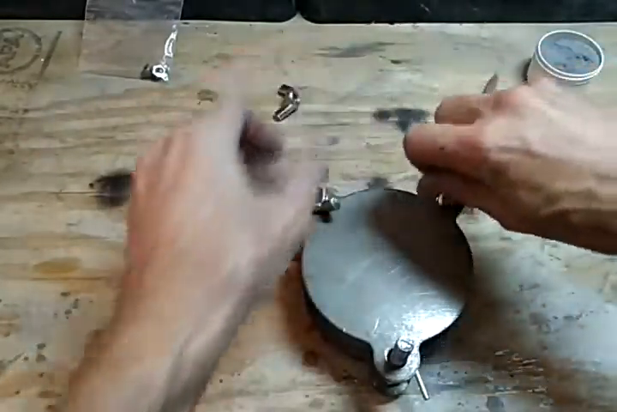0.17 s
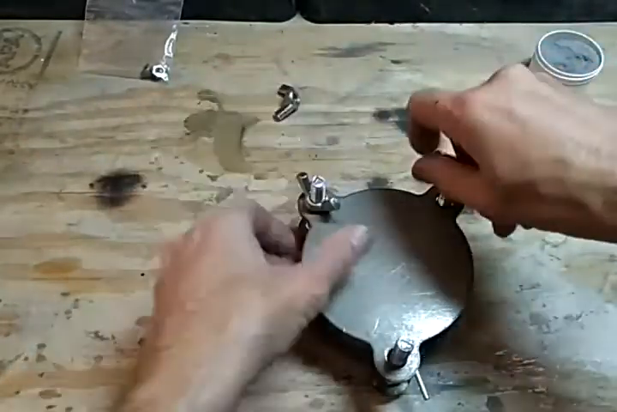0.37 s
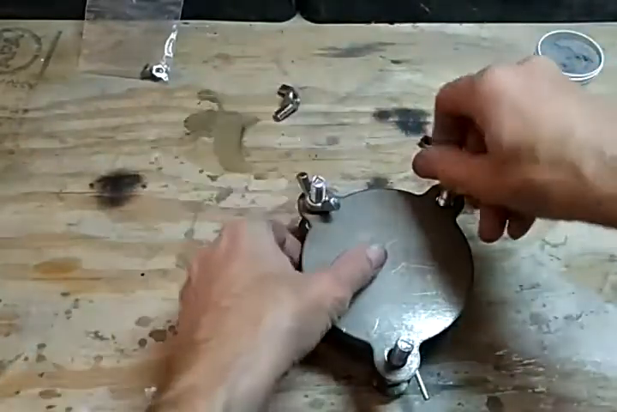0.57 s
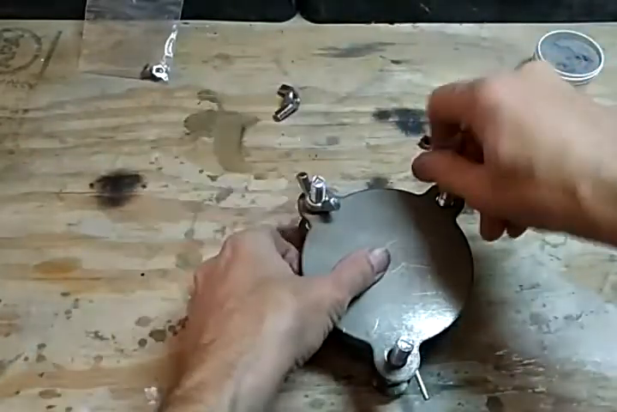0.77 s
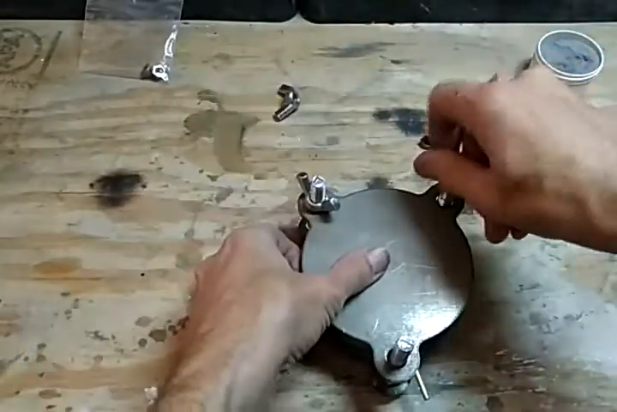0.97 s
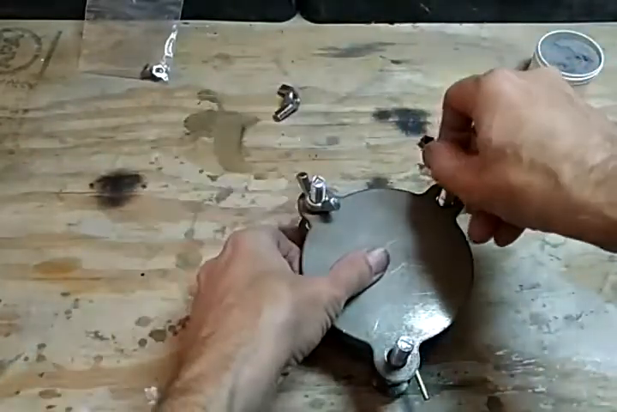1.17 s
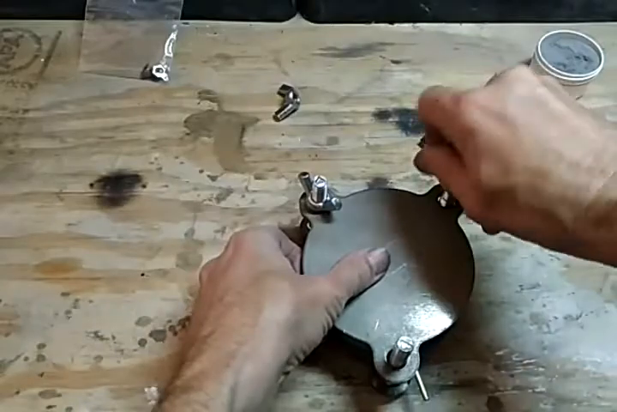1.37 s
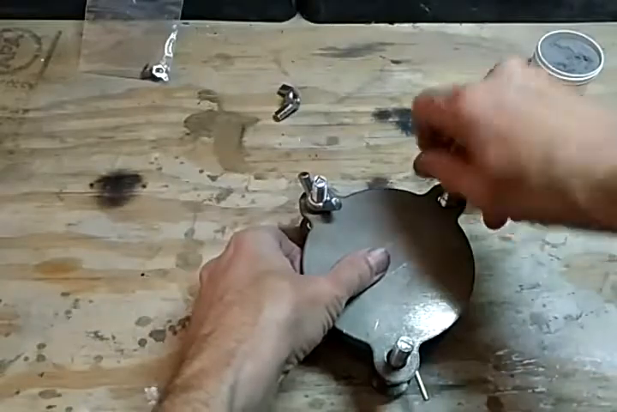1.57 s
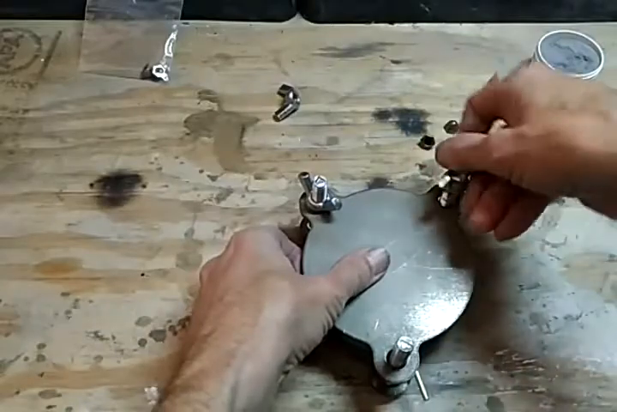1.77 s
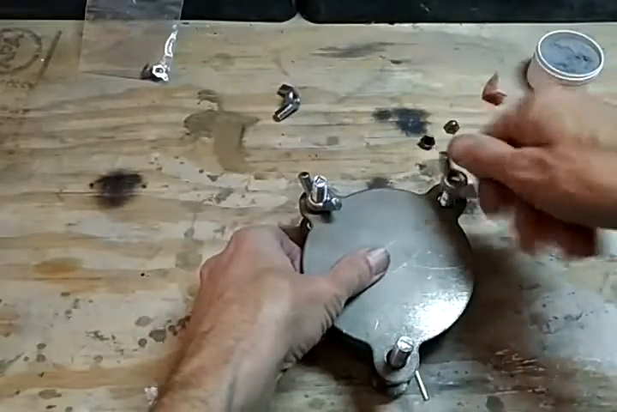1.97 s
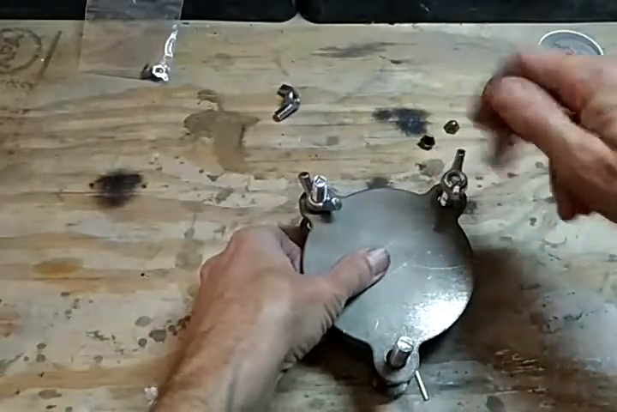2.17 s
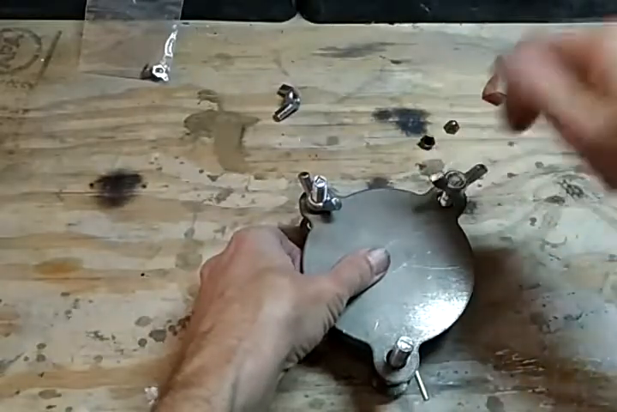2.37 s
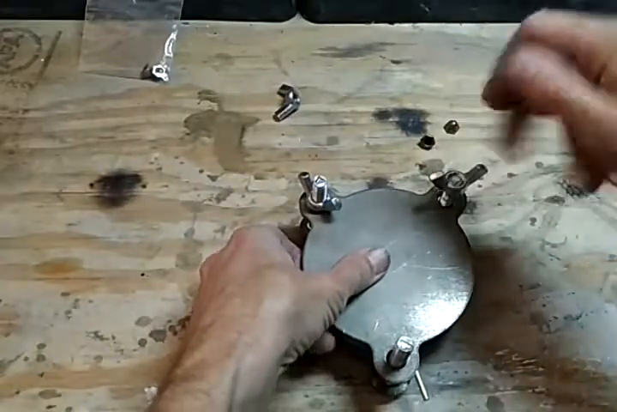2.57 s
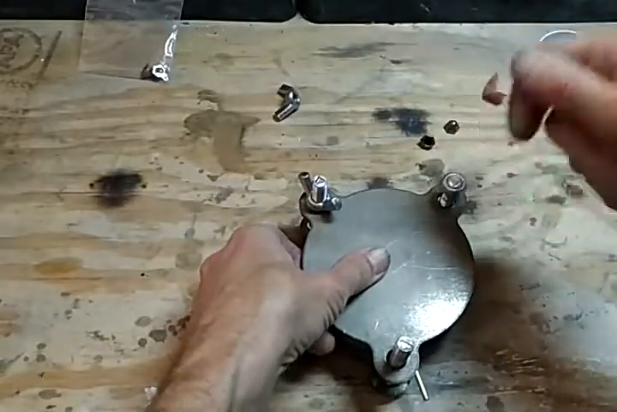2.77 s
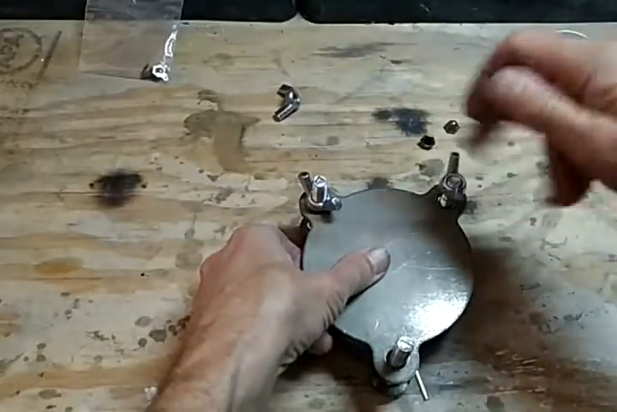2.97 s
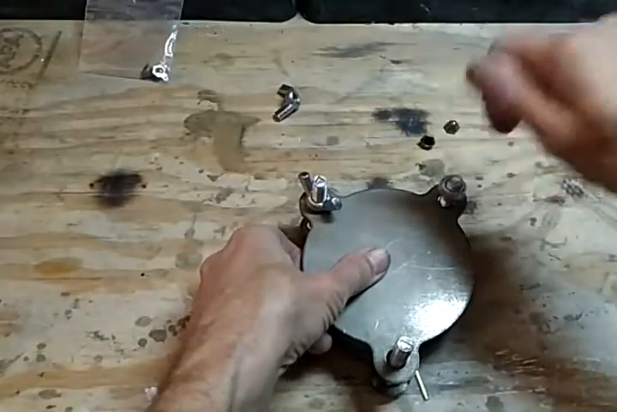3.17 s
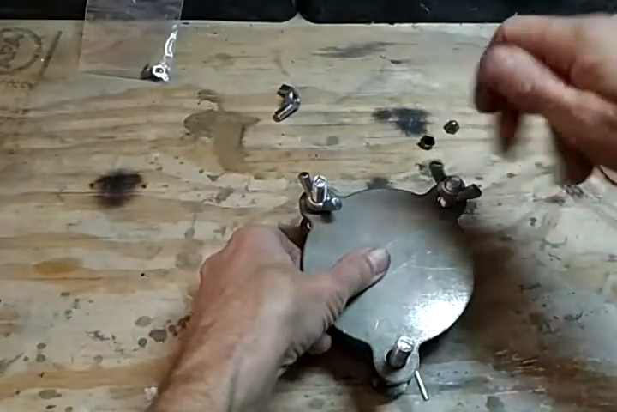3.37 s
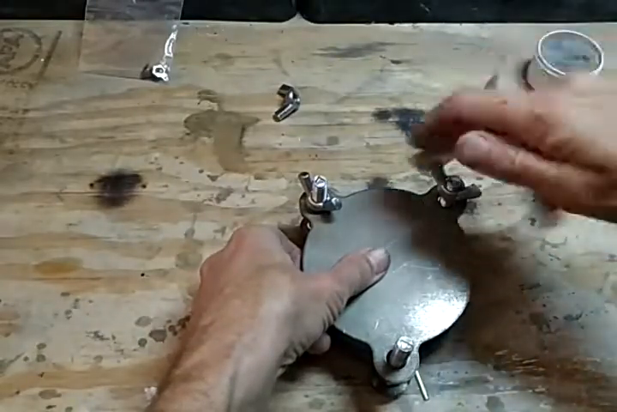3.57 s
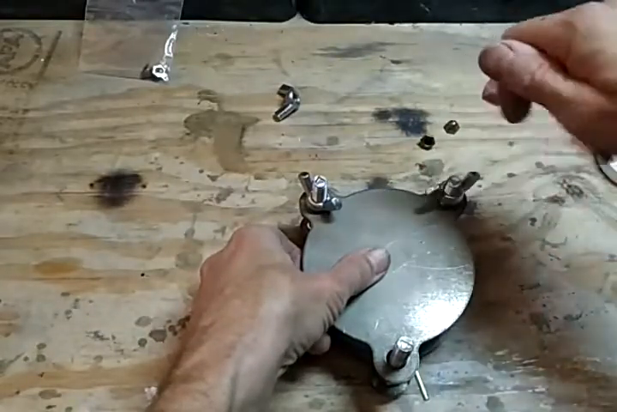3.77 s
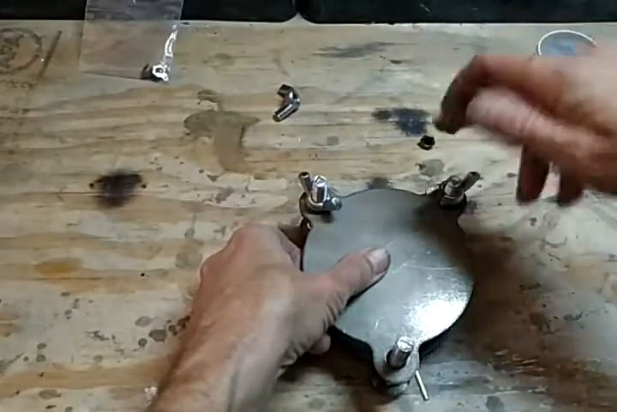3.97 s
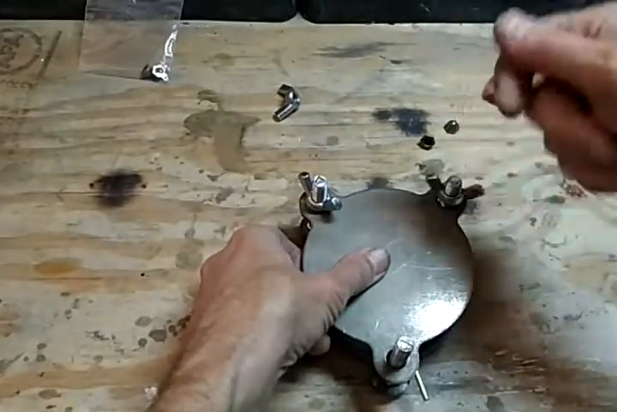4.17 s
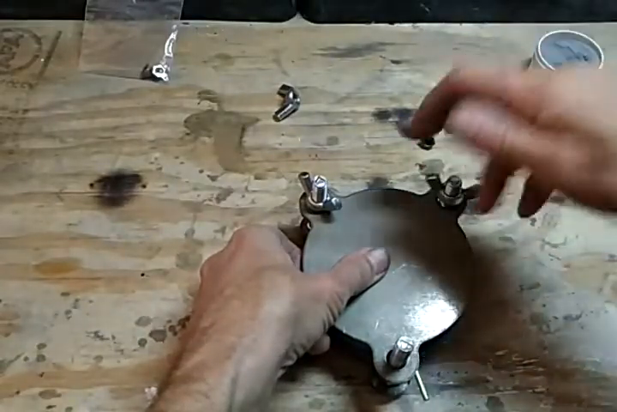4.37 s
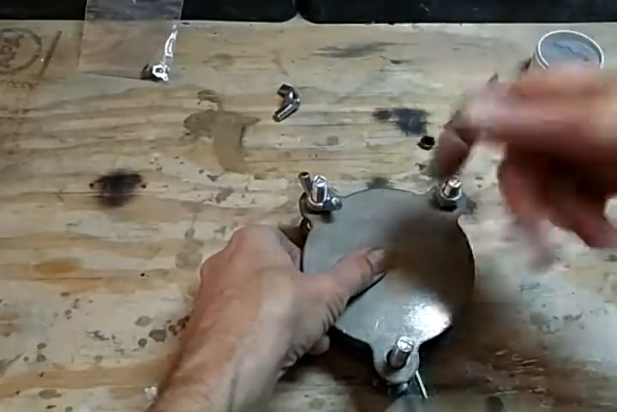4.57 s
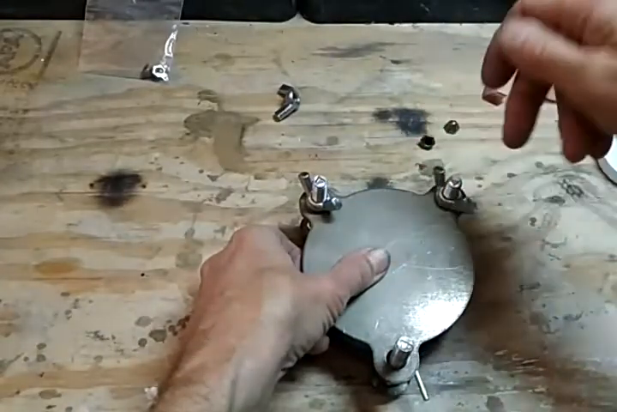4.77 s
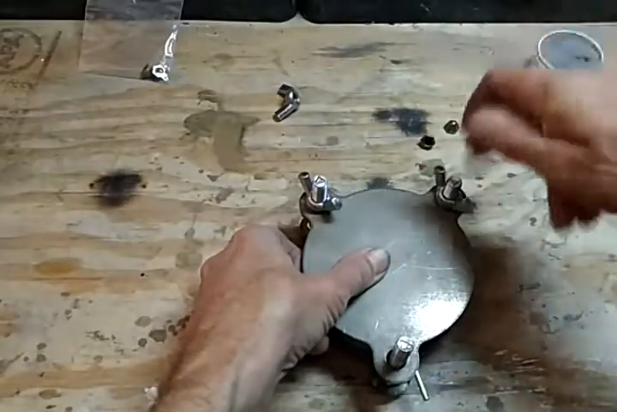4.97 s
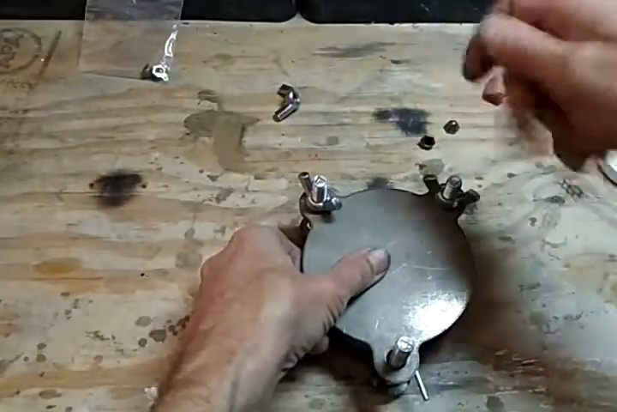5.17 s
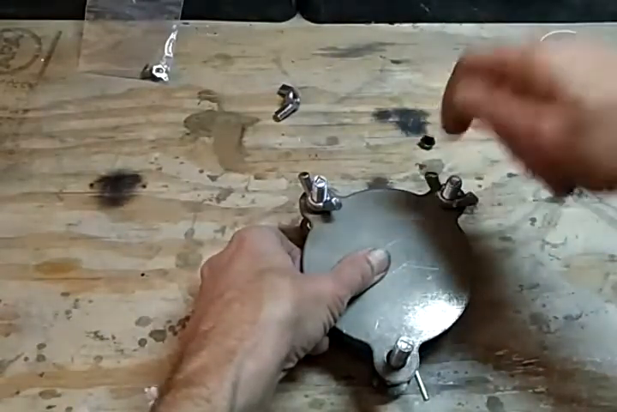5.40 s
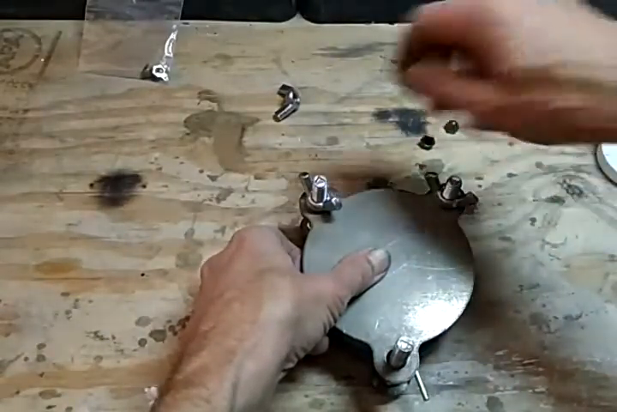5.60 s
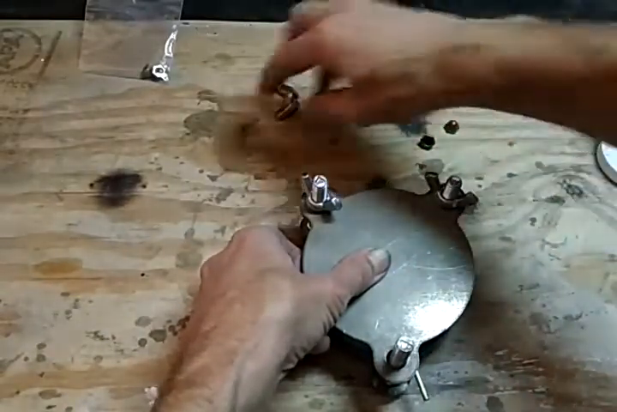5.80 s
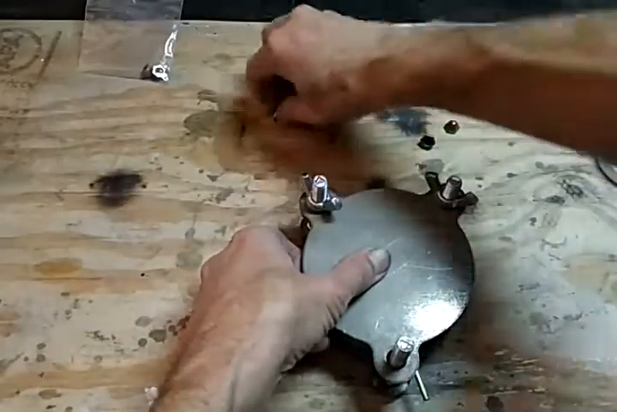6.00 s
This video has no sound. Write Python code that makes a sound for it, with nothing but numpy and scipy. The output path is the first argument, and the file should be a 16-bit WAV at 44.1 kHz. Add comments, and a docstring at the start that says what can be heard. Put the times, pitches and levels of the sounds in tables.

```python
"""A wing nut is started on the stud of a steel frame held down on a plywood workbench.
Fingers fumble it onto the thread and flick its wings: force pulses ring banks of modes and noise clouds.
After most wing contacts random thread blows chatter; the loose nut wobbles into clatters, a dry thread squeals.
Decaying bending modes thud as hands push the bench; one lands at the end and a spare nut ticks on wood.
Decaying noise is the small workshop's echo; shaped noise and sines are its air and faint mains hum."""
import sys
import numpy as np
from scipy import signal
from scipy.fft import rfft, irfft, next_fast_len
from scipy.io import wavfile
from scipy.ndimage import map_coordinates

SR = 44100
rng = np.random.default_rng(int(sys.argv[2]) if len(sys.argv) > 2 else 0)


def generate_wav(sig):
    """Save sig (samples, or channels by samples) to the path in sys.argv[1] as 16-bit PCM at SR."""
    pcm = np.round(np.clip(np.atleast_2d(sig).T, -1, 1) * 32767).astype(np.int16)
    wavfile.write(sys.argv[1], SR, pcm)


N = 266275

# Event levels are burst levels: the rms if all the energy fell within 10 ms.
# room air spectrum: [frequency_hz, relative_density_db_per_hz]
AIR_SPECTRUM = [(12, -67), (20, -41), (39, -24.5), (60, 3), (86, -12), (172, -6.5), (210, -15),
                (241, -12.5), (328, -18), (472, -17.5), (802, -19), (976, -20), (2390, -26.5),
                (16000, -33.5)]
# left-right correlation of the air: [frequency_hz, correlation_ratio]
AIR_CORRELATION = [(60, 0.8), (240, 0.8), (950, -0.049), (3770, -0.11), (15000, 0.043)]
# mains hum partials: [frequency_hz, rms_level_db]
HUM_PARTIALS = [(59.6, -81.5), (120, -78.5), (240, -84.5), (479.5, -80)]
# workshop echo decay: [frequency_hz, t60_s]
SHOP_DECAY = [(100, 0.34), (300, 0.5), (800, 0.35), (2000, 0.25), (5000, 0.22), (13000, 0.2)]
# soft pushes on the bench top, by the holding hand and the other hand landing: [start_s, level_db]
HAND_THUMPS = [(0.772,-52), (1.272,-49.5), (2.335,-43), (2.413,-43), (3.214,-43.5), (3.606,-41),
               (3.713,-35.5), (3.764,-42.5), (5.368,-47), (5.896,-30), (5.995,-46.5)]
# slow bending modes of the plywood: [frequency_hz, relative_level_db, t60_s]
PLYWOOD_MODES = [(91, -14.5, 0.18), (146.8, 0.5, 0.13), (177, -12, 0.11), (421, -8, 0.064)]
# fingers land on a spare nut lying on the bench and push it: [start_s, level_db, t60_s]
SPARE_NUT_TICKS = [(5.9025, -37.5, 0.034), (5.921, -46.5, 0.13), (5.952, -47.5, 0.046)]
# steel on wood: [frequency_hz, relative_density_db_per_hz]
TICK_SPECTRUM = [(350, 3), (650, -11), (1000, -0.5), (1400, 0.5), (2000, -5), (2900, -4.5), (4300, -22),
                 (5500, -20.5), (8500, -19), (15000, -52)]
# dry thread's lower tone, with both modes' level: [time_s, pitch_hz, level_db]
SQUEAL_CURVE = [(.44, 3360, -105), (.5, 3390, -78), (.62, 3390, -82), (.85, 3360, -80), (1.2, 3330, -83),
                (1.33, 3340, -105)]
# modes of each struck part, nominal: [frequency_hz, relative_level_db, t60_s]
BENCH_MODES = [(94.6, -9, 0.18), (148, 0, 0.12), (314.6, -4.5, 0.11), (362.7, -1, 0.11),
               (461.3, -1.5, 0.11)]
FRAME_MODES = [(818.4, 5.5, 0.081), (951, -5, 0.16), (1206, -13.5, 0.095), (1274, -4.5, 0.1),
               (1348, 5, 0.046), (1522, 2, 0.05), (2030, -1.5, 0.078), (2286, -4, 0.11)]
NUT_MODES = [(3110, -6, 0.025), (3490, -5.5, 0.017), (4550, -6, 0.057), (4800, 7, 0.026),
             (4846, 1.5, 0.022), (5730, -32, 0.047), (6550, -4.5, 0.083), (7040, 4, 0.055),
             (7340, -1, 0.059), (8180, -3, .04), (8260, -0.5, .04), (8700, 1.5, 0.071), (9760, -3.5, 0.034),
             (11350, -9.5, .03), (12270, -6.5, 0.067), (12620, -13.5, 0.036), (14500, -23, 0.028),
             (15400, -26, .025)]
# dense, quickly damped resonances between those modes: [frequency_hz, relative_density_db_per_hz]
BENCH_CLOUD = [(35, -45), (75, -23), (140, -1), (230, -18), (350, 3), (500, -8), (700, -12), (1500, -61)]
FRAME_CLOUD = [(300, -9.5), (600, -11), (830, 2), (1050, -0.5), (1400, 1.5), (1780, -11.5), (2250, -0.5),
               (2650, -13), (3500, -8), (7000, -75)]
NUT_CLOUD = [(1300, -45), (2500, -11), (3400, -2.5), (4000, -15.5), (4700, 9), (5400, -5.5), (6800, -1),
             (8400, 3.5), (9300, -12), (10600, -22), (12400, -17), (13600, -19), (14600, -18.5),
             (16000, -37)]
# gain of the metal sound in the right channel: [frequency_hz, gain_db]
RIGHT_CHANNEL_SHADE = [(2500, -0.5), (4200, -1.5), (6400, -7), (8200, -16.5), (10000, -12.5), (15000, -6)]
# nut bumps the stud, mostly while fingers feel for the thread: [contact_s, click_db, thud_db]
STUD_TAPS = [(0.0722,-48,-44), (.0766,-36.5,-44), (.135,-59,-52), (.287,-67.5,-51), (0.3925,-52.5,-52.5),
             (.406,-72.5,-50.5), (.54,-83,-63), (0.7578,-44,-45.5), (0.9594,-70.5,-53), (1.0481,-57,-56.5),
             (1.2603,-69,-46.5), (1.552,-75,-61), (1.605,-73,-53.5), (1.6563,-43,-46), (1.9187,-43,-53),
             (1.943,-39,-44), (2.749,-44.5,-46.5), (2.868,-48,-49.5)]
# clatters of the wobbling nut: [hardest_knock_s, knock_gap_s, frame_db, nut_db], levels of the hardest knock
WOBBLE_CLATTERS = [(2.356,0.0093,-35.5,-31), (2.804,.0095,-34.5,-31), (3.127,0.0069,-43.5,-40.5),
                   (3.165,0.0053,-38.5,-35.5), (3.219,0.01,-33,-26), (3.625,.008,-41,-39),
                   (3.688,.009,-43,-46), (3.726,.008,-29,-23), (4.064,0.0093,-32.5,-26.5),
                   (4.084,.005,-38.5,-32), (4.695,0.014,-39.5,-40), (5.064,0.0076,-42.5,-43)]
# bright contacts at the wing, most followed by a spin; the one at 5.357 s is a faint lead-in to the next:
# [contact_s, click_db, thud_db, hardness_db_per_octave, spin_length_s]
WING_CONTACTS = [(2.31,-27,-37,-1,0.057), (2.6899,-23.5,-37,1,0.13), (3.114,-49,-41.5,-10,0.12),
                 (3.5837,-41.5,-45.5,3,0.11), (4.0379,-21.5,-35,5.5,0.083),
                 (4.4113,-45.5,-47.5,12.5,0.0074), (4.523,-31.5,-47,5,.21), (5.0105,-36.5,-42.5,10.5,0.021),
                 (5.357,-64,-59.5,13,0), (5.3653,-51,-46,-8,0.0029)]

LOW_CUT_HZ, TOP_HZ = 47, 16000
LIFE_SAMPLES = SR // 3  # echo, thump and tick length; a part's own ring has half
AGE_S = np.arange(LIFE_SAMPLES) / SR
TAP_HARDNESS_DB_PER_OCTAVE = -8.5  # held between the fingers, the nut sounds dull
FRAME_CLICK_SHARE = 0.32  # frame level in dB: this share of the click, the rest of the thud
# noise lead-in relative to the knock: LEAD_IN_DB at a click of LEAD_IN_AT_DB, lower for stronger clicks
LEAD_IN_DB, LEAD_IN_FALL_DB_PER_DB, LEAD_IN_AT_DB = -11.5, 0.58, -41.5
SWELL_DB_PER_KNOCK, FADE_DB_PER_KNOCK = 2, 10  # up to the hardest knock, then down
KNOCK_WIDTH_SHARE = 0.27  # Gaussian sigma of a flurry, as a share of the knock gap
MELLOW_DB, HARDENING_DB_PER_OCTAVE_PER_DB = -31.5, 0.13  # louder knocks than MELLOW_DB are brighter
SPIN_SWELL_DB = 1  # slope over a whole spin, taken in steps
SQUEAL_FLUTTER_DB = 4


def amp(db):
    """Decibels to gain."""
    return 10 ** (np.asarray(db) / 20)


def unit(x):
    """x at rms 1."""
    return x / np.sqrt(np.mean(x ** 2) + 1e-20)


def burst(x):
    """x with the mean energy per channel of 10 ms at rms 1."""
    return unit(x) * np.sqrt(SR / 100 / x.shape[-1])


def along(points, hz):
    """Interpolate (Hz, value) points on a log frequency axis."""
    point_hz, values = np.transpose(points)
    return np.interp(np.log(hz + 1), np.log(point_hz + 1), values)


def filtered(x, gain):
    """x times a gain that depends on frequency."""
    n = x.shape[-1]
    padded = next_fast_len(n + SR // 20, True)
    spectrum = rfft(x, padded) * gain(np.fft.rfftfreq(padded, 1 / SR))
    return irfft(spectrum, padded)[..., :n]


def spread(pair, width):
    """Left and right from a shared and an opposed signal."""
    shared, opposed = pair[0], width * pair[1]
    return np.array([shared + opposed, shared - opposed])


def add(track, start_s, sound):
    """Mix a sound into the track at start_s."""
    part = track[:, max(round(start_s * SR), 0):][:, :sound.shape[-1]]
    part += sound[:, :part.shape[-1]]


def wobble(rate_hz):
    """Smooth random curve with rate_hz knots a second."""
    knots = rng.standard_normal(int(N * rate_hz / SR) + 4)
    return map_coordinates(knots, [np.arange(N) * rate_hz / SR])


def room_tone(air_db):
    """Steady air noise, its likeness between channels set per frequency, plus mains hum sines."""
    def stereo_gain(hz):
        angle = np.arccos(np.clip(along(AIR_CORRELATION, hz), -1, 1)) / 2
        return amp(along(AIR_SPECTRUM, hz)) * [np.cos(angle), np.sin(angle)]

    air = filtered(rng.standard_normal((2, N)), stereo_gain)
    t_s = np.arange(N) / SR
    hum = sum(amp(db) * unit(np.sin(2 * np.pi * (hz * t_s + rng.random()))) for hz, db in HUM_PARTIALS)
    return amp(air_db) * unit(spread(air, 1)) + hum


def shop_echo():
    """Impulse response of the shop: noise in which each frequency dies at its own speed."""
    noise = rng.standard_normal((2, LIFE_SAMPLES))
    hz, t_s, bins = signal.stft(noise, SR, nperseg=256)
    decay = amp(-60 * t_s / along(SHOP_DECAY, hz)[:, None])
    tail = signal.istft(bins * decay, SR, nperseg=256)[1][:, :LIFE_SAMPLES]
    onset = (1 - np.exp(-AGE_S / 0.0018)) ** 2
    tail = spread(tail * onset, 0.34)
    return tail / np.linalg.norm(tail[0])


def thumps(rise_s, room_db):
    """Soft flesh wakes only the lowest bending modes of the bench top, with a slow onset."""
    track = np.zeros((2, N))
    for start_s, level_db in HAND_THUMPS:
        flex = sum(amp(db - 60 * AGE_S / t60_s) * np.sin(2 * np.pi * hz * AGE_S)
                   for hz, db, t60_s in PLYWOOD_MODES)
        flex = amp(level_db) * burst(flex * (1 - np.exp(-AGE_S / rise_s)))
        echo = signal.fftconvolve(flex[None], shop_echo(), axes=1)[:, :LIFE_SAMPLES]
        add(track, start_s, flex + amp(room_db) * echo)
    return track


def pickup(room_db):
    """Pinched against wood the spare nut cannot ring: decaying noise gives dull ticks."""
    track = np.zeros((2, N))
    for start_s, level_db, t60_s in SPARE_NUT_TICKS:
        noise = rng.standard_normal((2, LIFE_SAMPLES))
        tick = filtered(noise, lambda hz: amp(along(TICK_SPECTRUM, hz)))
        tick = amp(level_db) * burst(spread(tick, 0.8) * amp(-60 * AGE_S / t60_s))
        echo = signal.fftconvolve(tick, shop_echo(), axes=1)[:, :LIFE_SAMPLES]
        add(track, start_s, tick + amp(room_db) * echo)
    return track


def squeal(upper_db, flutter_db):
    """The dry thread sings thinly on two modes, uneven in pitch and level, as the nut is started."""
    time_s, pitch_hz, level_db = np.transpose(SQUEAL_CURVE)
    t_s = np.arange(N) / SR
    hz = np.interp(t_s, time_s, pitch_hz) * (1 + 0.0087 * wobble(74))
    phase = 2 * np.pi * np.cumsum(hz) / SR
    tone = np.sin(phase) + amp(upper_db) * np.sin(1.61 * phase)
    tone = tone * amp(flutter_db * wobble(18.4))
    return unit(tone) * np.interp(t_s, time_s, amp(level_db), left=0, right=0)


def ring(modes, spectrum, cloud_db, cloud_t60_s, width, hardness=0):
    """A struck part: modes at random strengths and phases, plus a fast-dying cloud of resonances."""
    t_s = AGE_S[:LIFE_SAMPLES // 2]
    hz, db, t60_s = np.transpose(modes)

    def tilt(f):  # a harder blow favours the upper modes; hardness in dB per octave
        return amp(hardness * np.log2(np.clip(f / hz[0], 1, 3)))

    size = amp(db + 2.4 * rng.standard_normal(len(hz))) * tilt(hz)
    turn = np.exp(2j * np.pi * rng.random((2, len(hz))))
    decaying = np.exp(np.outer(2j * np.pi * hz - np.log(1000) / t60_s, t_s))
    lines = ((size * turn) @ decaying).real
    noise = rng.standard_normal((2, len(t_s)))
    cloud = filtered(noise, lambda f: amp(along(spectrum, f)) * tilt(f))
    cloud = cloud * amp(-60 * t_s / cloud_t60_s)
    return spread(unit(lines) + amp(cloud_db) * unit(cloud), width)


def shake(force, frame_db, bench_db, nut_db, hardness):
    """A force at the nut rings the nut at once, then the frame, then the heavy bench top."""
    t_s = AGE_S[:LIFE_SAMPLES // 2]
    # a blow cushioned by a finger is all thud, and dulls the frame too
    softening = -0.8 * max(bench_db - nut_db - 10.0, 0)
    nut = ring(NUT_MODES, NUT_CLOUD, cloud_db=3.5, cloud_t60_s=0.019, width=1.0, hardness=hardness)
    frame = ring(FRAME_MODES, FRAME_CLOUD, cloud_db=1.0, cloud_t60_s=0.063, width=0.56, hardness=softening)
    bench = ring(BENCH_MODES, BENCH_CLOUD, cloud_db=1.5, cloud_t60_s=0.11, width=0.11)
    frame = frame * (1 - np.exp(-t_s / 0.00018))
    bench = bench * (1 - np.exp(-t_s / 0.004))

    def driven(part, level_db):
        return amp(level_db) * burst(signal.fftconvolve(part, force[None], axes=1))

    nut, frame, bench = driven(nut, nut_db), driven(frame, frame_db), driven(bench, bench_db)
    echo_send = amp(-11.5) * nut + amp(-12) * frame + amp(-12) * bench
    sound = signal.fftconvolve(echo_send, shop_echo(), axes=1)
    add(sound, 0, nut + frame + bench)
    return sound


def chatter(contact_rate_hz, scatter_db):
    """Tiny uneven blows of thread on thread, at random moments."""
    chance = rng.random(LIFE_SAMPLES)
    size = rng.standard_normal(LIFE_SAMPLES)
    side = rng.choice([-1, 1], LIFE_SAMPLES)
    return (chance < contact_rate_hz / SR) * side * amp(scatter_db * size)


def rattles(bench_db, count):
    """The wobbling nut knocks ever harder, then once more weakly; each knock is a flurry of blows."""
    track = np.zeros((2, N))
    for hardest_s, gap_s, frame_db, nut_db in WOBBLE_CLATTERS:
        width_s = KNOCK_WIDTH_SHARE * gap_s
        reach_s = width_s * 2.5
        t_s = np.arange(-reach_s, reach_s, 1 / SR)
        for k in np.arange(count) - (count - 2):  # 0 is the hardest knock
            db = min(SWELL_DB_PER_KNOCK * k, -FADE_DB_PER_KNOCK * k)
            blows = chatter(contact_rate_hz=1000, scatter_db=3.5)[:len(t_s)]
            force = blows * np.exp(-0.5 * (t_s / width_s) ** 2)
            force[len(t_s) // 2] += 1  # the wobble always lands a blow at its peak
            hardness = HARDENING_DB_PER_OCTAVE_PER_DB * (nut_db + db - MELLOW_DB)
            knock = shake(force, frame_db + db, frame_db + db + bench_db, nut_db + db, hardness)
            add(track, hardest_s + k * gap_s - reach_s, knock)
    return track


def spins(frame_db, bench_db, nut_db, hardness, count):
    """The spinning nut runs down the thread: low, growing chatter, its ring redrawn stretch by stretch."""
    track = np.zeros((2, N))
    for contact_s, *_, length_s in WING_CONTACTS:
        if length_s > 0:
            stretch_s = length_s / count
            for k in range(count):
                force = chatter(contact_rate_hz=1500, scatter_db=5)[:round(stretch_s * SR)]
                force[0] += 1
                # energy grows with length; level offsets hold for a 10 ms stretch
                db = SPIN_SWELL_DB * k / count + 10 * np.log10(stretch_s * 100)
                sound = shake(force, frame_db + db, bench_db + db, nut_db + db, hardness)
                add(track, contact_s + k * stretch_s, sound)
    return track


def contact_knocks():
    """Contacts at stud and wing: a short faint noise lead-in, then the knock, drive all three parts."""
    track = np.zeros((2, N))
    lead_in_samples = SR // 300
    contacts = [(*row, TAP_HARDNESS_DB_PER_OCTAVE) for row in STUD_TAPS]
    contacts += [row[:-1] for row in WING_CONTACTS]
    for contact_s, click_db, thud_db, hardness in contacts:
        frame_db = FRAME_CLICK_SHARE * click_db + (1 - FRAME_CLICK_SHARE) * thud_db
        lead_in_db = LEAD_IN_DB - LEAD_IN_FALL_DB_PER_DB * (click_db - LEAD_IN_AT_DB)
        lead_in = amp(lead_in_db) * rng.standard_normal(lead_in_samples) / np.sqrt(lead_in_samples)
        force = np.append(lead_in, 1)
        sound = shake(force, frame_db, thud_db, click_db, hardness)
        add(track, contact_s - lead_in_samples / SR, sound)
    return track


def scene():
    """Sum all sources; the metal's treble is weaker in the right channel."""
    metal = contact_knocks()
    metal += spins(frame_db=-47.0, bench_db=-58.5, nut_db=-55.0, hardness=-5, count=5)
    metal += rattles(bench_db=-8.0, count=4)
    metal = filtered(metal, lambda hz: np.array([np.ones_like(hz), amp(along(RIGHT_CHANNEL_SHADE, hz))]))
    thread = squeal(upper_db=-2, flutter_db=SQUEAL_FLUTTER_DB)
    hands = thumps(rise_s=0.0084, room_db=-11.5) + pickup(room_db=-6.5)
    return metal + hands + thread + room_tone(air_db=-62.5)


def record(dry):
    """Second-order high-pass at LOW_CUT_HZ and a very steep low-pass at TOP_HZ."""
    high_pass = signal.butter(2, LOW_CUT_HZ, "highpass", fs=SR, output="sos")
    lean = signal.sosfilt(high_pass, dry)
    return filtered(lean, lambda hz: 1 / np.sqrt(1 + (hz / TOP_HZ) ** 120))


dry = scene()
out = record(dry)
generate_wav(out)
```